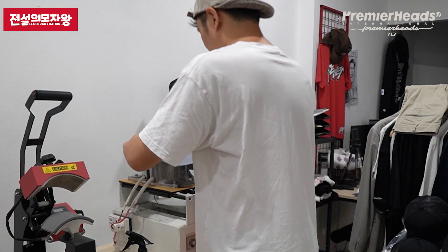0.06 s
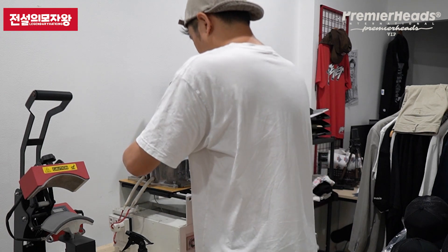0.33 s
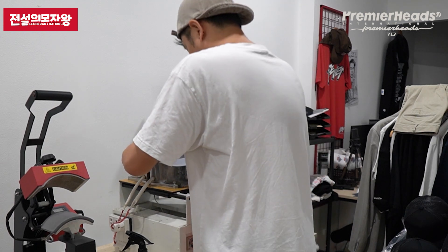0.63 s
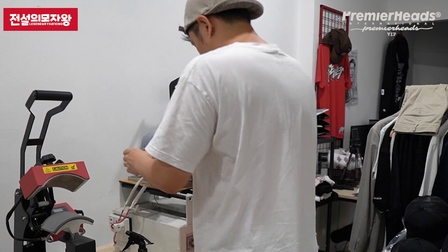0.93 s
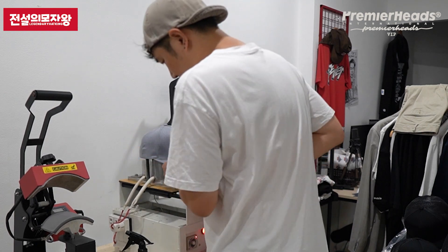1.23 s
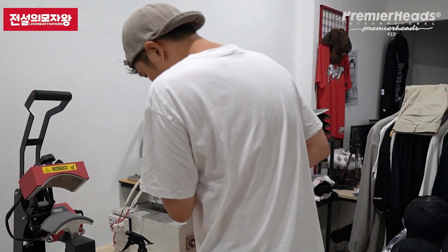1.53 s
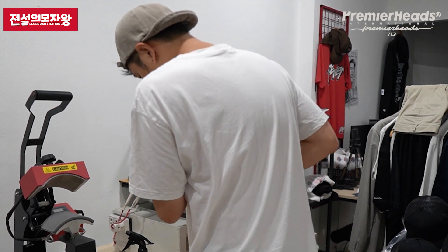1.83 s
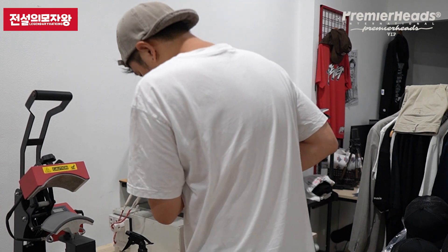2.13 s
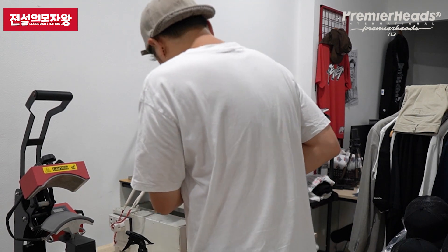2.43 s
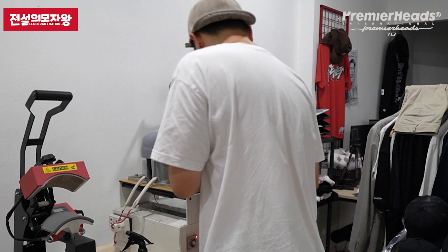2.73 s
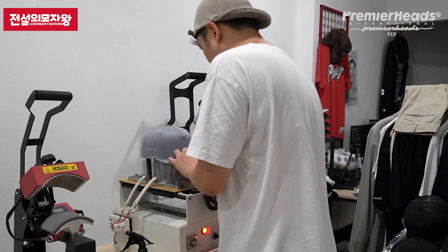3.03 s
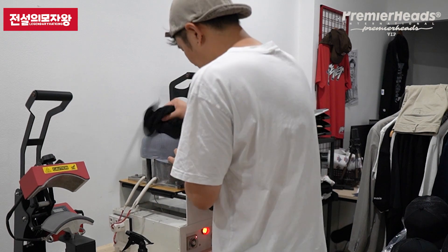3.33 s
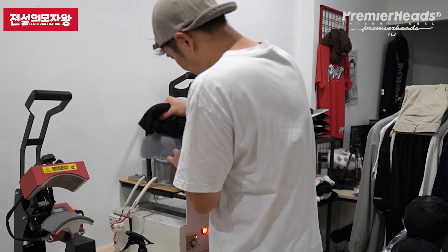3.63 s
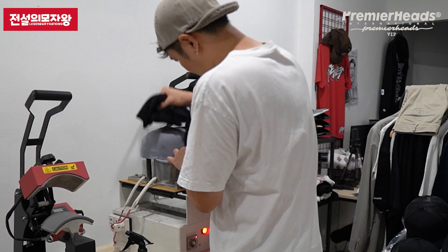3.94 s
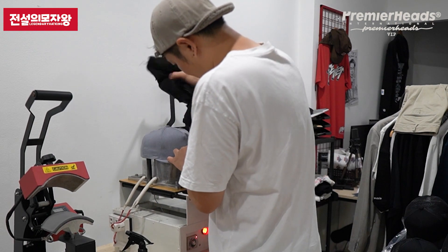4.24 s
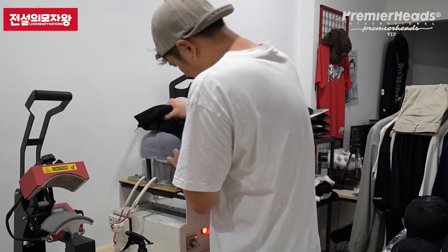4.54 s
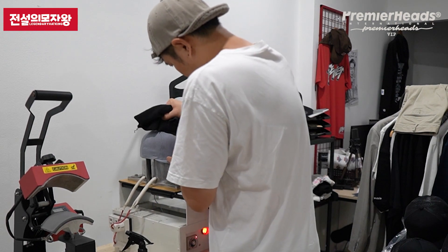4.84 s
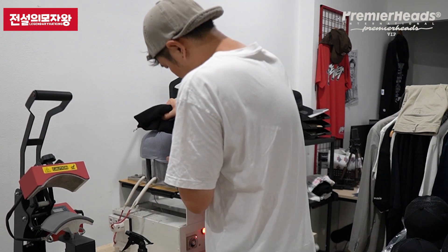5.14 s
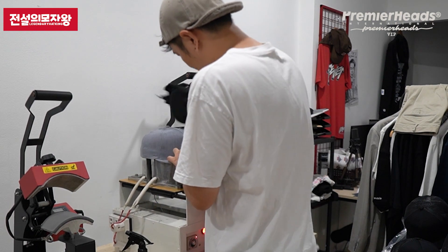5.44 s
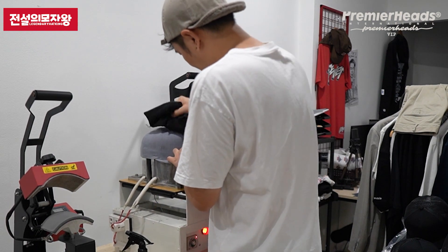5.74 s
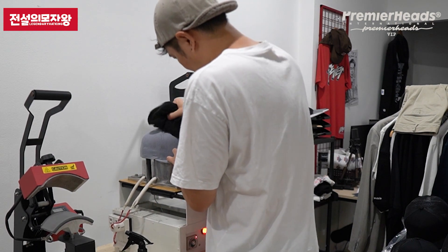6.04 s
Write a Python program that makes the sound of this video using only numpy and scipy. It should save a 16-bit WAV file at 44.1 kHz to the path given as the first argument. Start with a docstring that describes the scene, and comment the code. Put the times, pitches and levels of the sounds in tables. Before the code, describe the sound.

A faint steady hiss comes from a hot cap shaping machine on the left. Fabric rustles quietly, then a cluster of clicks, ticks and soft knocks sounds as hands adjust a cap. A pad strikes the hollow metal form in two quick runs, five blows and then three softer ones, making it boom while the loose frame clatters. Everything is heard from about two metres away in a slightly reverberant workshop.

```python
"""Shaping a cap on a metal form

Hands settle a cap on a small shaping machine with bumps and clicks, then beat it with a pad in two bursts.
Each impact excites damped modes: the hollow form thuds and booms, the loose frame clacks and rattles
against its stops, and a small metal part jingles. Cloth rustles by friction over a faint hiss from the
left. The machine stands a couple of metres away in a reverberant workshop."""
import sys
import numpy as np
from scipy import signal
from scipy.fft import rfft, irfft, next_fast_len
from scipy.io import wavfile

SR = 44100
rng = np.random.default_rng(int(sys.argv[2]) if len(sys.argv) > 2 else 0)


def output_pcm(signal):
    """Save a mono or channel-first signal as 16-bit PCM at the path in sys.argv[1].

    Samples are clipped to [-1, 1] before scaling.
    """
    pcm = np.clip(np.atleast_2d(signal).T, -1, 1) * 32767
    wavfile.write(sys.argv[1], SR, np.round(pcm).astype(np.int16))


N = 272097
TIME = np.arange(N) / SR
RING_TIME = np.arange(SR // 3) / SR
BANDS = 40 * 2 ** (np.arange(27) / 3)  # third-octave centres [Hz]
SPOTS = 6  # radiating points on the machine
REBOUND_S = 0.0125  # from a blow until the frame meets its stop

# spectrum of the hiss: (frequency [Hz], relative density [dB])
HISS_SPECTRUM = [(24, -81), (40, -44.5), (112, -37.5), (163, -15), (237, -18.5), (269, -14.5), (503, -9),
                 (585, -7), (990, -4.5), (1240, -9), (2630, -14), (5310, -33), (5870, -34), (7930, -45.5),
                 (16000, -66)]
# direction of the hiss: (frequency [Hz], left minus right [dB])
HISS_BALANCE = [(100, -1), (380, 5.5), (1200, 11), (5000, 12.5), (15000, 20)]
# bright swishes of sleeves and dull rubs of the cap:
# (peak time [s], release [s], level [dB], treble gain [dB])
CLOTH_STROKES = [(.18, 0.068, -65.5, 4), (0.257, 0.076, -61.5, 11), (.48, 0.16, -75.5, 12),
                 (.785, 0.043, -72, 5), (.935, 0.099, -61, -7), (1.87, 0.24, -54.5, -15),
                 (3.02, 0.18, -60, -32), (5.48, .13, -69, -10)]
# spectrum of cloth friction: (frequency [Hz], relative density [dB])
CLOTH_SPECTRUM = [(200, -8), (1000, 17.5), (3000, 4.5), (7000, -4.5), (12000, -5.5), (16000, -23)]
# bumps of hands and cap: (time [s], level [dB], centre frequency [Hz])
CAP_BUMPS = [(.776, -58, 310), (1.523, -46.5, 634), (1.705, -46.5, 840), (1.963, -38.5, 860),
             (2.075, -51, 1050), (2.248, -50.5, 775), (3.115, -57, 2180)]
# clicks of the fittings: (time [s], level [dB], treble gain [dB], ring gain [dB], knock gain [dB],
# pitch [Hz])
FITTING_CLICKS = [(1.121, -63, 18, -20, -0.5, 3230), (1.465, -60, -5, -1, -14, 2000),
                  (1.483, -42.5, -1, -1, -9, 2580), (1.487, -44, 17, 0.5, -10.5, 8300),
                  (1.571, -48.5, 13, -22, -7, 1960), (1.604, -42.5, -1.5, -9, -8, 1780),
                  (1.831, -54, 2, -10, -8, 6000), (1.885, -42, 10, -11, -10, 5200),
                  (2.49, -59.5, 3, -18, -20, 2500), (5.161, -56.5, 3.5, 0, 6.5, 2830),
                  (5.226, -47, 7.5, -16, -3.5, 1920)]
# spectrum of a click: (frequency [Hz], relative density [dB])
CLICK_SPECTRUM = [(100, -43), (300, -17), (900, 3), (1900, 8.5), (3500, -8.5), (5500, -7.5), (9000, -17),
                  (15500, -40)]
# modes of the fittings: (frequency [Hz], relative level [dB], t60 [s])
FITTING_RESONANCES = [(910, 27.5, 0.044), (1556, 3, 0.32), (2410, 0, 0.057), (2720, -26, 0.085),
                      (2570, 19, 0.047), (2970, -14, .12), (4840, -15, 0.12), (5000, -13, 0.061),
                      (5750, -5, 0.081), (7880, 6.5, 0.16), (8700, -18, 0.071), (15700, 2, 0.13)]
# blows of the pad: (time [s], thud reference level [dB], thud centre [Hz], clack level [dB],
# rattle level [dB], rattle length [s], rebound level [dB], landing delay [s], landing level [dB],
# rest delay [s])
PAD_BLOWS = [(3.398, -36.5, 693, -32, -29, .17, -35, 0.096, -48, 0.18),
             (3.663, -23.5, 605, -26.5, -29.5, 0.1, -26, 0.077, -38.5, .176),
             (3.908, -24, 686, -29.5, -34, 0.099, -27.5, .069, -35, 0.17),
             (4.131, -24, 746, -29, -30.5, .13, -32, 0.068, -33.5, 0.14),
             (4.38, -26, 685, -29.5, -33, .11, -37.5, 0.093, -34, 0.17),
             (5.731, -38.5, 600, -37.5, -33.5, .17, -33, .072, -44.5, .133),
             (5.921, -36.5, 814, -33, -32, .14, -38.5, .046, -51, 0.15),
             (6.084, -31, 600, -31, -28, 0.19, -35, .040, -41, .13)]
# spectrum of a clack: (frequency [Hz], relative density [dB])
CLACK_SPECTRUM = [(100, -28), (155, -17), (190, 4.5), (300, 9.5), (450, 4), (700, 11.5), (1300, 6.5),
                  (2300, 5), (4000, -5.5), (5500, -9.5), (7400, -13), (9000, -25), (15500, -27.5)]
# modes of the frame: (frequency [Hz], relative level [dB])
FRAME_RESONANCES = [(1410, -52.5), (2223, -49), (2444, -39), (2622, -49), (2934, -80), (3187, -68.5),
                    (3618, -60.5), (3720, -64), (3951, -47.5), (4140, -46), (4221, -54.5), (5560, -60.5),
                    (6202, -72)]
# modes of the hollow form: (frequency [Hz], relative level [dB], t60 [s])
FORM_RESONANCES = [(190, -12, .4), (204, -11.5, 0.3), (285.6, -2, 0.31), (433.4, 7, 0.33), (560, 1, 0.266),
                   (601, 6, 0.47), (643, 6, 0.13), (725, 9, 0.23), (886, 10, 0.32), (1030, -10, .35)]
# modes of the loose metal part: (frequency [Hz], relative level [dB], t60 [s])
JINGLE_RESONANCES = [(5580, -3.5, .09), (7440, -2, .06), (10320, 1, 0.045), (10580, 2, 0.046),
                     (10930, 1, .05), (12950, -2, .08), (12850, -6.5, .05)]
# the workshop: (frequency [Hz], t60 [s], reverberant over direct [dB], side over mid [dB])
REVERBERATION = [(200.4, 0.17, 0, -19), (538, 0.33, 6, -10.5), (1035, 0.48, 3.5, -5.5),
                 (2600, 0.32, 6, -5.5), (7130, 0.27, 4, -3), (14000, 0.15, 8.5, -9.5)]


def undb(db):
    """Amplitude grows tenfold for every 20 dB."""
    return 10 ** (np.asarray(db) / 20)


def on_bands(table):
    """Interpolation in log frequency gives a table's columns at the band centres."""
    hz, *columns = np.transpose(table)
    return np.squeeze([np.interp(np.log(BANDS), np.log(hz), c) for c in columns])


def unit(x):
    """Normalisation to energy 1 along the last axis."""
    return x / np.sqrt(np.sum(x ** 2, axis=-1, keepdims=True) + 1e-18)


def band_gains(density_db):
    """Band power is spectral density times bandwidth, here scaled to a total of 1."""
    return unit(undb(density_db) * np.sqrt(BANDS))


def treble_share(corner_hz):
    """A first-order high-pass power response, rising from 0 towards 1 across the bands."""
    return BANDS ** 2 / (BANDS ** 2 + corner_hz ** 2)


def hump(hz, octaves, skirt_db):
    """A broad resonance as band gains: a Gaussian peak on a faint wide skirt."""
    away = np.log2(BANDS / hz) / octaves
    return unit(np.exp(-away ** 2 / 2) + undb(skirt_db) / (1 + away ** 2))


def band_noise(size):
    """Filtering white noise gives an independent signal of rms 1 in each band."""
    octaves = np.log2((np.arange(size // 2 + 1) * SR / size + 1) / BANDS[:, None])
    window = np.cos(np.pi / 2 * np.clip(3 * octaves, -1, 1))
    white = rng.standard_normal((len(BANDS), size))
    return unit(irfft(window * rfft(white), size)) * np.sqrt(size)


def drift(rate_hz):
    """Interpolation between random values gives a drift with a spread near 1."""
    points = rng.standard_normal(int(N / SR * rate_hz) + 2)
    return np.interp(TIME * rate_hz, np.arange(len(points)), points)


def decay(t, t60):
    """Damping lowers amplitude exponentially, by 60 dB in t60; one row for each t60."""
    return np.exp(-np.log(1000) * t / np.reshape(t60, (-1, 1)))


def burst(noise, gains, t60, attack_s=0.002):
    """Densely overlapping modes respond to a brief push like decaying noise."""
    start = rng.integers(noise.shape[1] - len(RING_TIME))
    t = RING_TIME[:int(np.max(t60) * SR)]
    envelope = decay(t, t60) * (1 - np.exp(-t / attack_s))
    return gains @ unit(noise[:, start:start + len(t)] * envelope)


def ring(hz, db, t60, scatter_db):
    """Separate modes superpose as damped sines; each contact shares the energy out anew."""
    gains = unit(undb(db + scatter_db * rng.standard_normal(len(hz))))
    signs = rng.choice([-1, 1], len(hz))
    modes = unit(np.sin(2 * np.pi * hz[:, None] * RING_TIME) * decay(RING_TIME, t60))
    return (gains * signs) @ modes


def add(tracks, s, db, sound):
    """Superposition at time s on a random spot; db is the rms of energy 1 packed into 20 ms."""
    start = min(int(s * SR), N)
    part = sound[:N - start]
    tracks[rng.integers(SPOTS), start:start + len(part)] += np.sqrt(0.02 * SR) * undb(db) * part


def machine_hiss(level_db=-67, drift_db=1, flicker_db=3, side_db=-8):
    """The hot machine emits wavering broadband noise; a level difference places it to the left."""
    flicker = np.array([drift(34) for _ in BANDS])
    wavering = undb(flicker_db * flicker + drift_db * drift(4.13))
    gains, pan_db = band_gains(on_bands(HISS_SPECTRUM)), on_bands(HISS_BALANCE)
    mid, side = (band_noise(next_fast_len(N, True))[:, :N] * wavering for _ in range(2))
    left = gains * undb(pan_db / 2) @ (mid + undb(side_db) * side)
    right = gains * undb(-pan_db / 2) @ (mid - undb(side_db) * side)
    return undb(level_db) * np.array([left, right])


def cloth_rustle(rough_db=1.5, right_db=-7, rise_over_release=0.76):
    """Stick-slip friction of fibres makes rough noise that swells and dies with each stroke."""
    treble = treble_share(6000)
    gains = band_gains(on_bands(CLOTH_SPECTRUM))
    common, separate = (band_noise(next_fast_len(N, True))[:, :N] for _ in range(2))
    dull = bright = 0
    for s, release_s, db, treble_db in CLOTH_STROKES:
        away = np.abs(TIME - s) / (release_s * np.where(TIME < s, rise_over_release, 1))
        swell = undb(db) * np.exp(-away ** 1.45)  # between pointed and bell-shaped
        dull = np.hypot(dull, swell)  # incoherent strokes add in power
        bright = np.hypot(bright, undb(treble_db) * swell)
    left, right = (dull * (gains * (1 - treble) @ noise) + bright * (gains * treble @ noise)
                   for noise in (common, (common + separate) / np.sqrt(2)))
    return undb(rough_db * drift(160)) * np.array([left, undb(right_db) * right])


def cap_bumps(noise):
    """Each soft impact of hand or cap excites one broad, heavily damped resonance."""
    out = np.zeros((SPOTS, N))
    for s, db, hz in CAP_BUMPS:
        add(out, s, db, burst(noise, hump(hz, octaves=0.81, skirt_db=-36), t60=0.019))
    return out


def fitting_clicks(noise, bounce_s=0.016, bounce_db=-16.5, focus_db=13):
    """Brief contact excites a wide spectrum: a fitting clicks, bounces once and rings."""
    out = np.zeros((SPOTS, N))
    mode_hz, mode_db, t60 = np.transpose(FITTING_RESONANCES)
    for s, db, treble_db, ring_db, knock_db, hz in FITTING_CLICKS:
        click = band_gains(on_bands(CLICK_SPECTRUM) + treble_db * treble_share(3500))
        knock = hump(hz, octaves=0.23, skirt_db=-40)
        for delay, drop_db in (0, 0), (bounce_s, bounce_db):
            add(out, s + delay, db + drop_db, burst(noise, click, t60=0.02))
            add(out, s + delay, db + drop_db + knock_db, burst(noise, knock, t60=0.019))
        excited_db = mode_db - focus_db * np.abs(np.log(mode_hz / hz))  # favours modes near the pitch
        add(out, s, db + ring_db, ring(mode_hz, excited_db, t60, scatter_db=4))
    return out


def cap_settling(noise, from_s=1.56, to_s=2.14, nudge_db=-56, tick_db=-57.5, count=13):
    """Fingers work the cap into place; irregular small impulses give damped nudges and ticks."""
    out = np.zeros((SPOTS, N))
    step = (to_s - from_s) / count
    tick = band_gains(on_bands(CLICK_SPECTRUM))
    for k in range(count):
        nudge_s, tick_s = from_s + step * (k + rng.random(2))
        softer_db, shift_octaves = rng.standard_normal(2) * [2, 0.29]
        nudge = hump(hz=477 * 2 ** shift_octaves, octaves=0.8, skirt_db=-36)
        add(out, nudge_s, nudge_db - softer_db, burst(noise, nudge, t60=0.044))
        add(out, tick_s, tick_db - softer_db, burst(noise, tick, t60=0.012))
    return out


def pad_blows(noise, thud_gain_db=-2):
    """A soft impact carries little treble: the pad thuds into the form and throws the loose frame."""
    out = np.zeros((SPOTS, N))
    for s, db, hz, *clatter, _ in PAD_BLOWS:
        add(out, s, db + thud_gain_db, burst(noise, hump(hz, octaves=0.5, skirt_db=-27), t60=0.038))
        frame_clatter(out, noise, s, *clatter)
    return out


def frame_clatter(out, noise, s, clack_db, rattle_db, rattle_s, rebound_db, landing_s, landing_db,
                  ring_db=-11, fall_db=8, scatter_db=7, bounces=14):
    """Inelastic collisions: the loose frame clacks, rebounds, rattles and falls back ringing."""
    t60 = 0.037 * (BANDS / 1000) ** -0.35  # low modes last longer
    spectrum, treble = on_bands(CLACK_SPECTRUM), treble_share(3000)
    add(out, s, clack_db, burst(noise, band_gains(spectrum - 9 * (BANDS < 500)), t60))
    # uneven small bounces that die away
    progress = (np.arange(bounces) + rng.random(bounces)) / bounces
    sizes = unit(undb(-fall_db * progress + scatter_db * rng.standard_normal(bounces)))
    for bounce_s, size in zip(s + 0.016 + progress * rattle_s, sizes):
        spot_db = 3 * rng.standard_normal(len(BANDS))
        bounce = band_gains(spectrum + spot_db + 0.8 * treble)
        add(out, bounce_s, rattle_db, size * burst(noise, bounce, t60))
    # two hard, bright contacts with the stops
    for delay, db, treble_db in (REBOUND_S, rebound_db, 9), (landing_s, landing_db, 7.5):
        add(out, s + delay, db, burst(noise, band_gains(spectrum + treble_db * treble), t60))
        add(out, s + delay, db + ring_db, ring(*np.transpose(FRAME_RESONANCES), t60=0.054, scatter_db=3.5))


def form_boom(gain_db=-6, swell_s=0.00069, pan_db=4.5):
    """Free vibration of the hollow form follows each blow, swelling as its walls take up the push."""
    out = np.zeros((SPOTS, N))
    swell = 1 - np.exp(-RING_TIME / swell_s)
    for s, db, *_ in PAD_BLOWS:
        boom = ring(*np.transpose(FORM_RESONANCES), scatter_db=-2.5)
        add(out, s, db + gain_db, unit(boom * swell))
    bass_cut = signal.butter(3, 140, "high", fs=SR, output="sos")
    return undb(np.array([[pan_db], [-pan_db]]) / 2) * signal.sosfilt(bass_cut, out.sum(axis=0))


def loose_part_jingles(noise, thrown_gain_db=-21.5, drop_db=-52, rest_db=-59.5):
    """The frame's stops excite the high modes of a small metal part; a last tick marks its rest."""
    out = np.zeros((SPOTS, N))
    tick = hump(hz=9500, octaves=0.14, skirt_db=-27.5)
    last_tick = hump(hz=7060, octaves=0.36, skirt_db=-22)
    for s, *_, rebound_db, landing_s, _, rest_s in PAD_BLOWS:
        for delay, db in (REBOUND_S, rebound_db + thrown_gain_db), (landing_s, drop_db):
            add(out, s + delay, db, ring(*np.transpose(JINGLE_RESONANCES), scatter_db=4))
            add(out, s + delay, db - 4, burst(noise, tick, t60=0.03))
        add(out, s + rest_s, rest_db, burst(noise, last_tick, t60=0.027))
    return out


def workshop(tracks, noise, pan_db=4, treble_pan_db=8, bass_hz=178, bass_floor_db=-19):
    """Direct sound from the left sums with each spot's diffuse wall echoes, widest in the treble."""
    t60, wet_db, side_db = on_bands(REVERBERATION)
    wet, width = undb(wet_db), undb(side_db)
    t = np.arange(SR // 2) / SR
    build_s = 0.0015 * (BANDS[:, None] / 1000) ** -0.8  # the bass builds up late
    envelope = decay(t, t60) * (1 - np.exp(-t / build_s))
    tail_gains = band_gains(0) * wet / np.sqrt((1 + wet ** 2) * (1 + width ** 2))
    size = next_fast_len(N + len(t), True)
    hz = np.arange(size // 2 + 1) * SR / size
    left_right = np.array([[1], [-1]])
    treble_pan = undb(left_right * treble_pan_db / 2 * hz / (hz + 3000))
    direct = treble_pan * np.interp(hz, BANDS, 1 / np.sqrt(1 + wet ** 2))
    # a source small against the wavelength radiates little bass
    bass_cut = signal.butter(8, bass_hz, "high", fs=SR, output="sos")
    radiated = signal.sosfilt(bass_cut, tracks) + undb(bass_floor_db) * tracks
    heard = 0
    for track in radiated:
        starts = rng.integers(noise.shape[1] - len(t), size=2)
        mid, side = (unit(noise[:, k:k + len(t)] * envelope) for k in starts)
        tail = tail_gains @ mid + left_right * (tail_gains * width @ side)
        heard = heard + rfft(track, size) * (direct + rfft(tail, size))
    return undb(left_right * pan_db / 2) * irfft(heard, size)[:, :N]


def scene():
    """Superposition of the reverberant impacts with the direct boom, rustle and hiss."""
    noise = band_noise(4 * SR)
    beating = pad_blows(noise) + loose_part_jingles(noise)
    handling = fitting_clicks(noise) + cap_bumps(noise) + cap_settling(noise)
    return workshop(beating + handling, noise) + form_boom() + cloth_rustle() + machine_hiss()


def record(dry, lag_samples=0.74, top_hz=15900):
    """A linear phase shift delays the left channel; a steep low-pass limits the bandwidth of both."""
    size = next_fast_len(N + SR, True)
    delay = np.exp(-2j * np.pi * lag_samples * np.arange(size // 2 + 1) / size)
    left = irfft(rfft(dry[0], size) * delay, size)[:N]
    low_pass = signal.ellip(10, 0.2, 80, top_hz, fs=SR, output="sos")
    return signal.sosfilt(low_pass, np.array([left, dry[1]]))


dry = scene()
out = record(dry)
output_pcm(out)
```